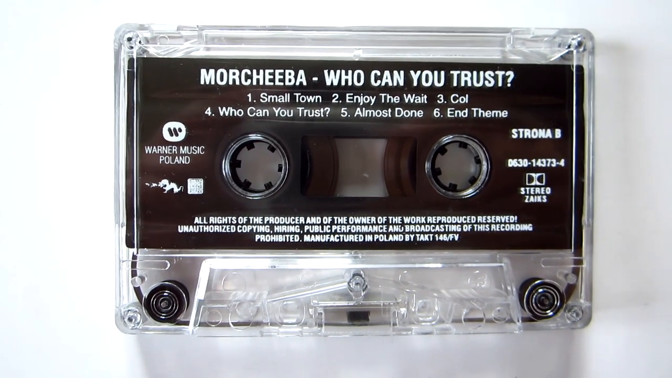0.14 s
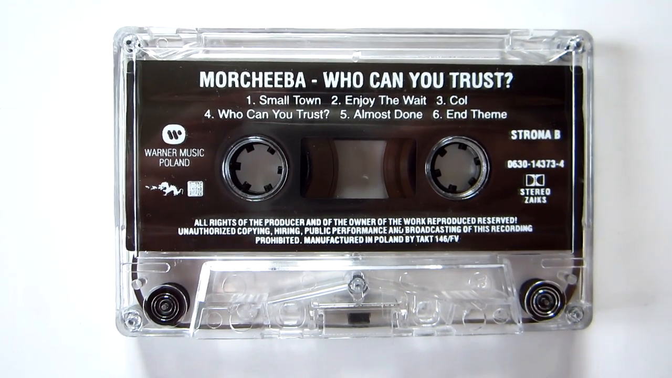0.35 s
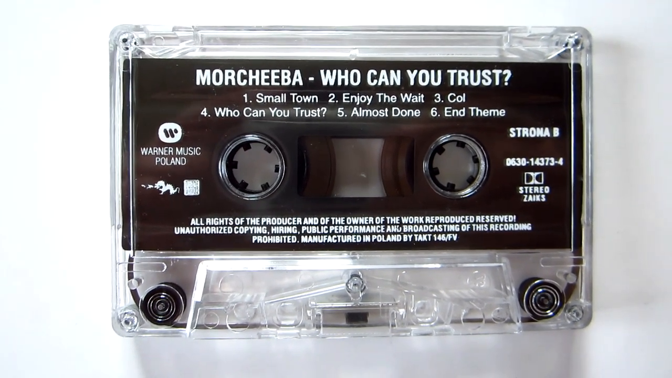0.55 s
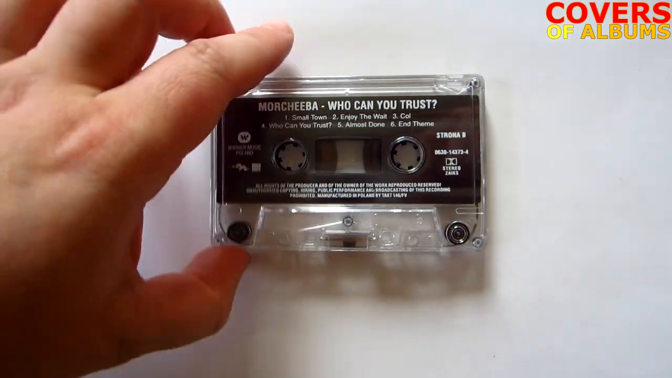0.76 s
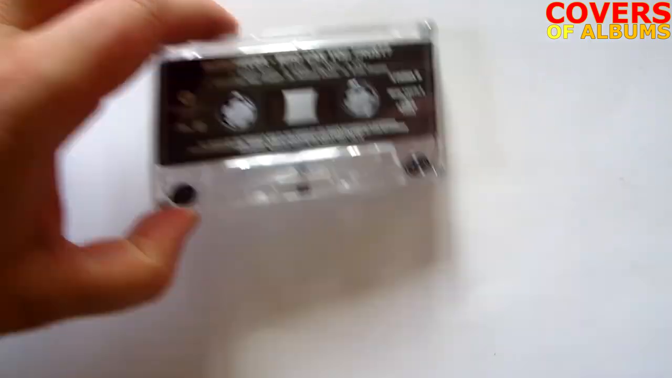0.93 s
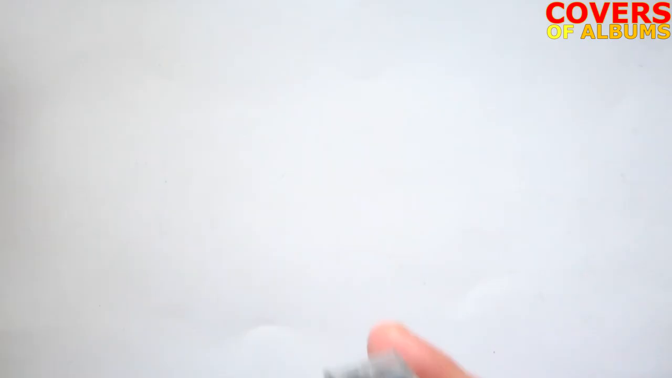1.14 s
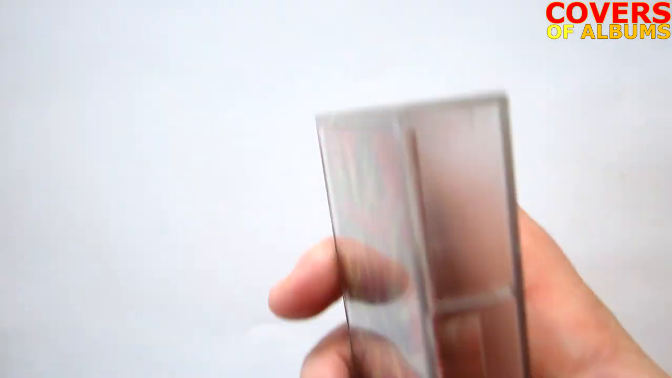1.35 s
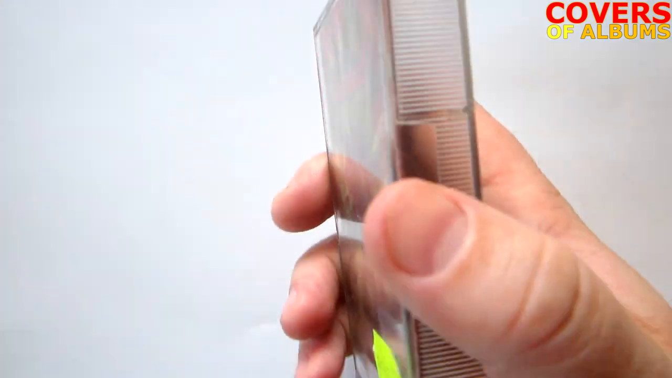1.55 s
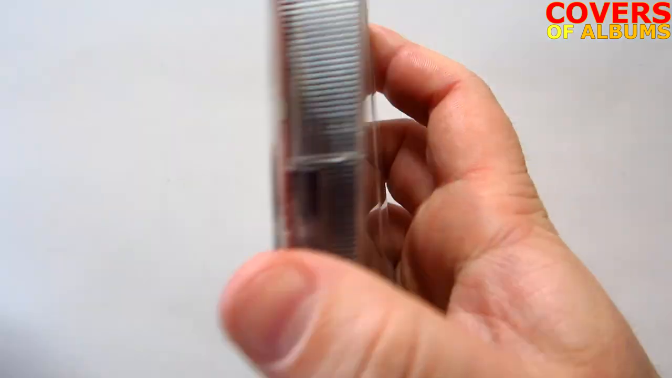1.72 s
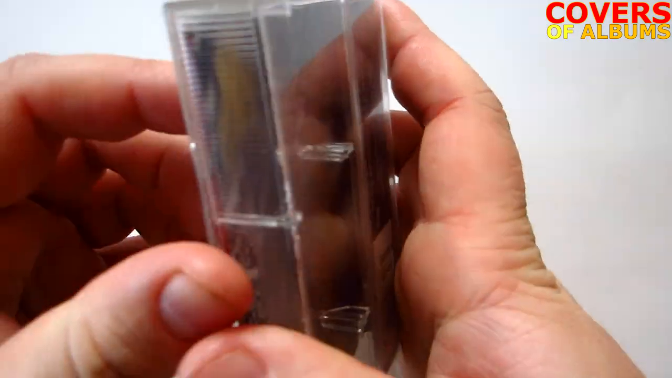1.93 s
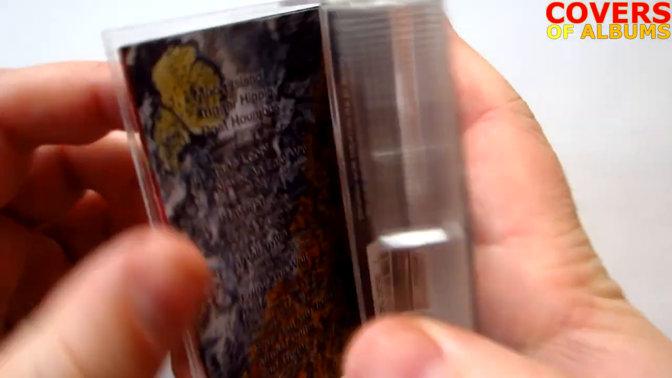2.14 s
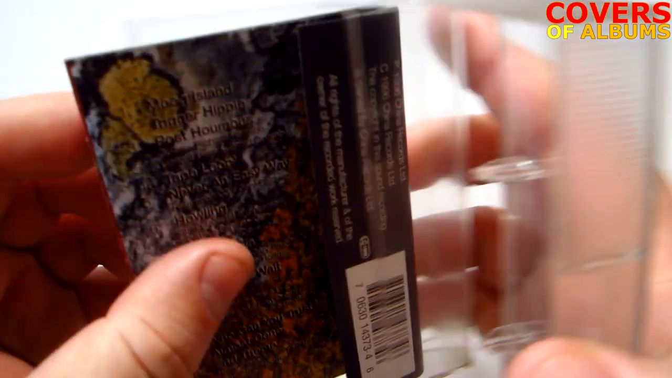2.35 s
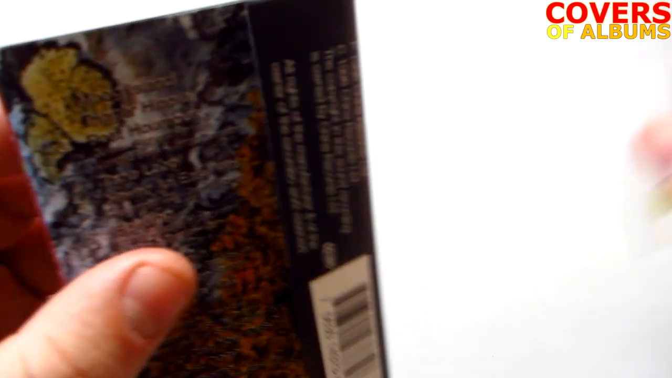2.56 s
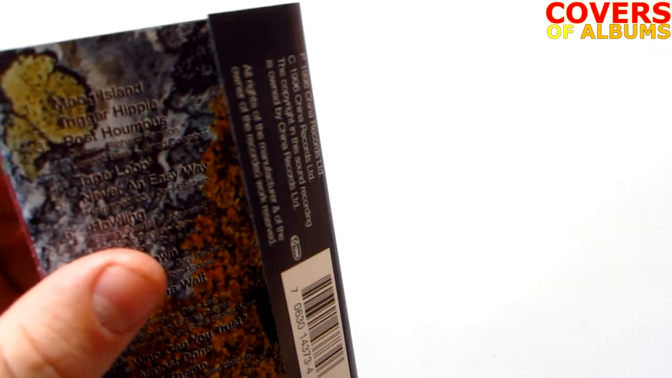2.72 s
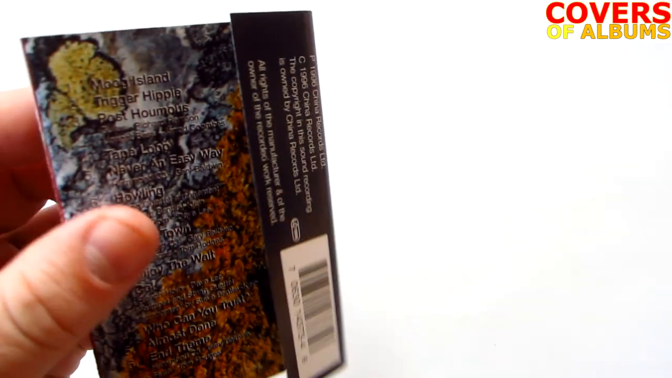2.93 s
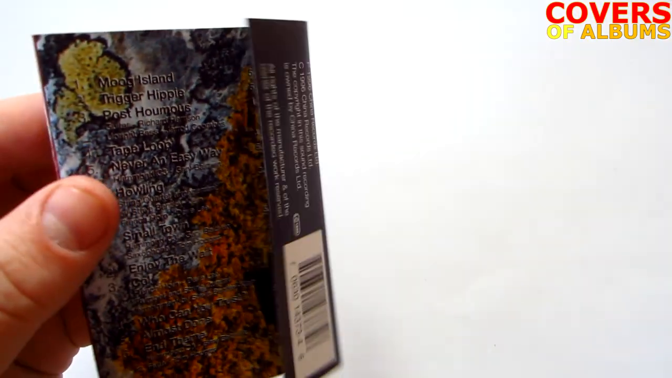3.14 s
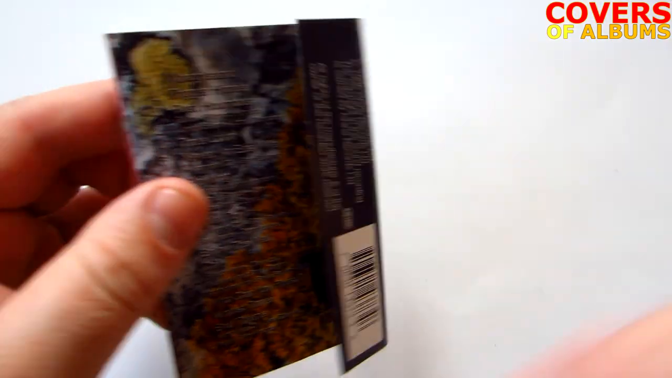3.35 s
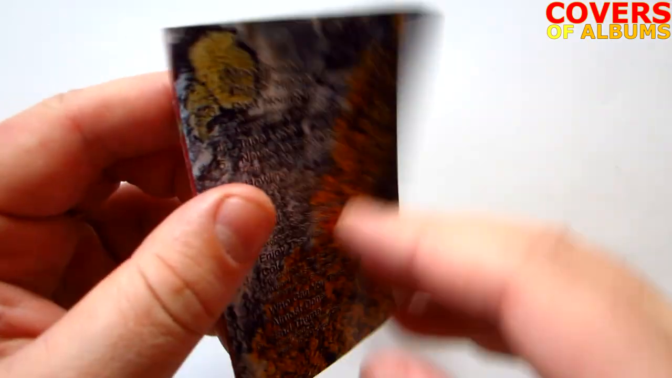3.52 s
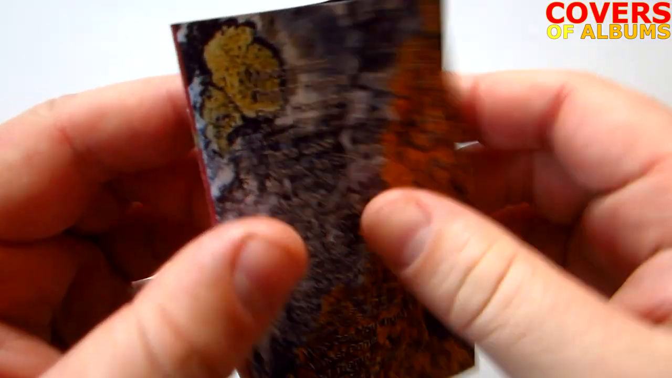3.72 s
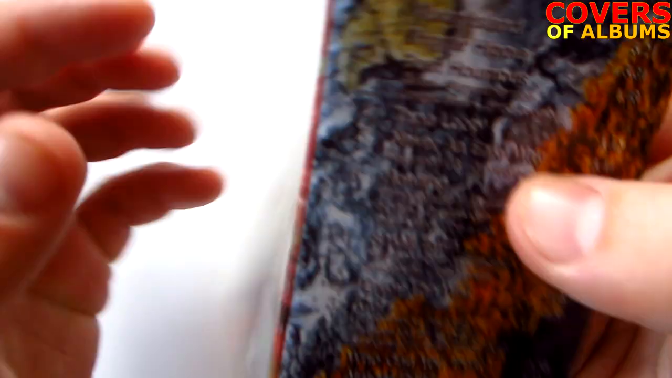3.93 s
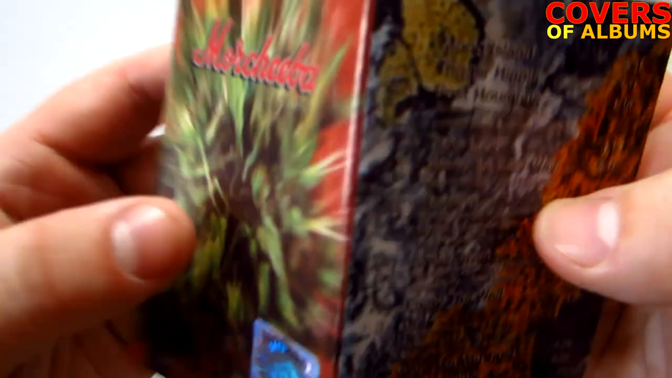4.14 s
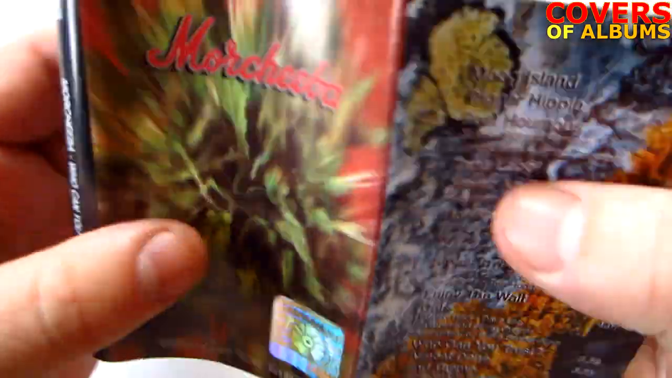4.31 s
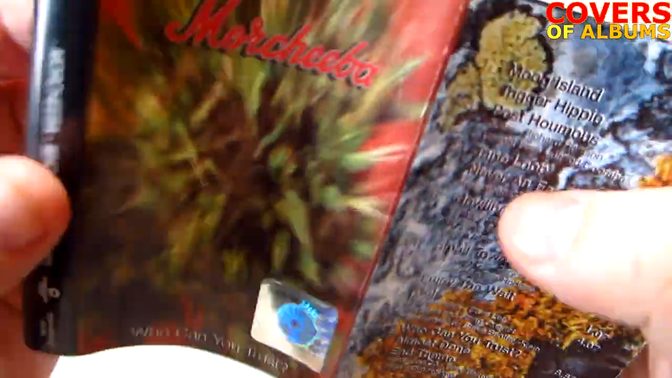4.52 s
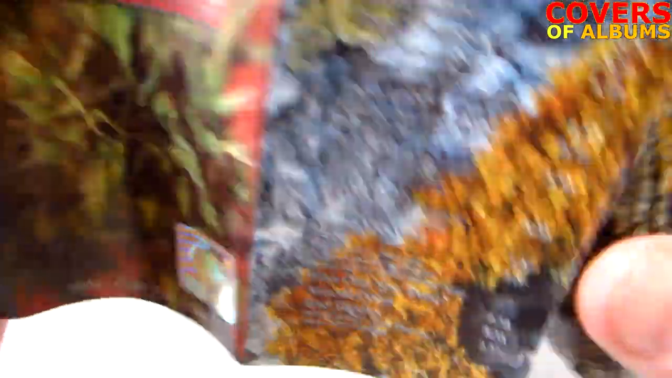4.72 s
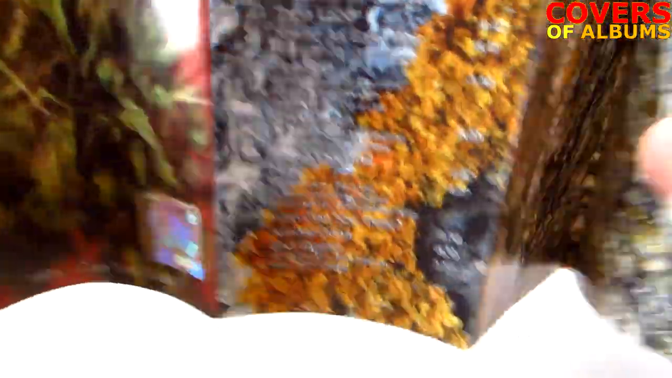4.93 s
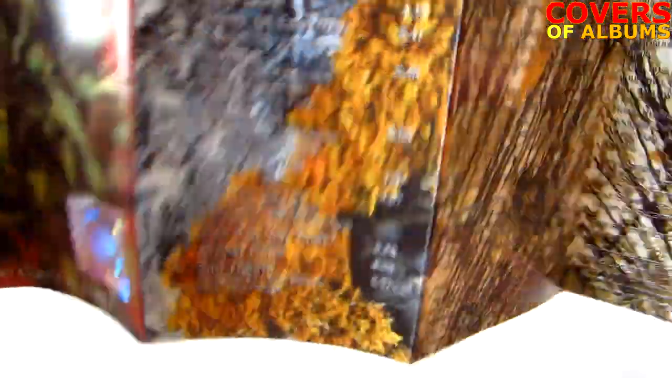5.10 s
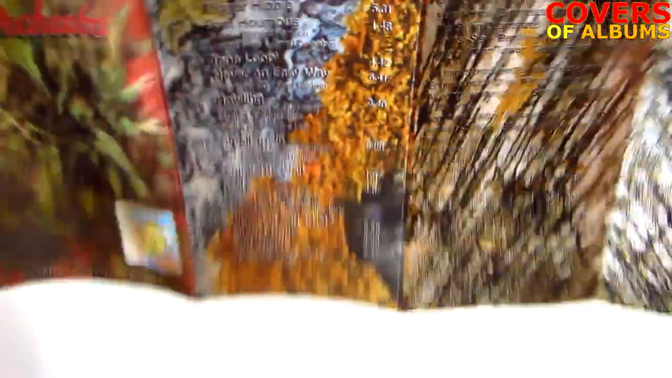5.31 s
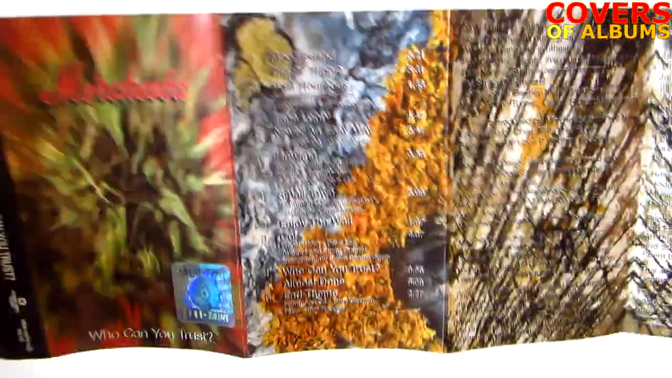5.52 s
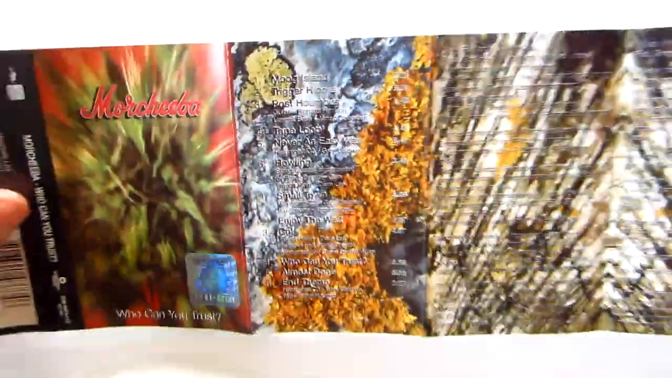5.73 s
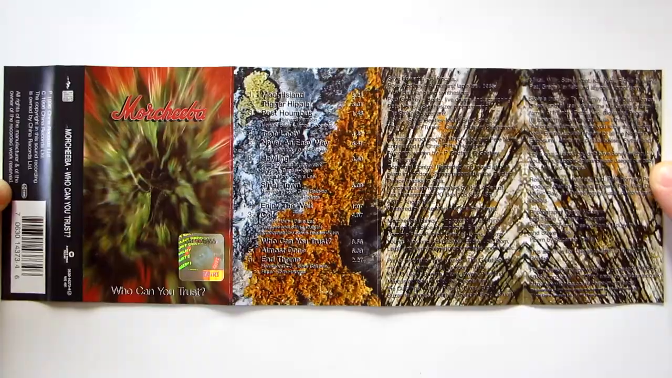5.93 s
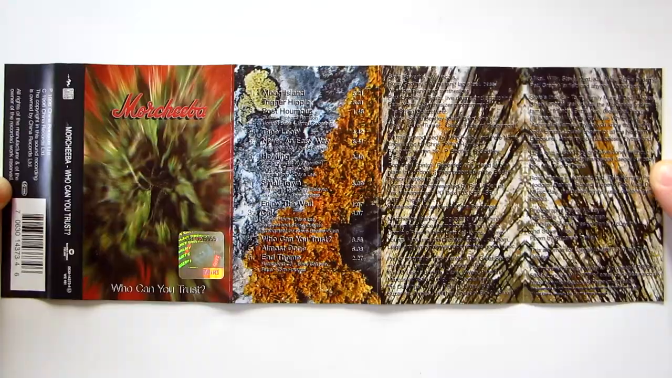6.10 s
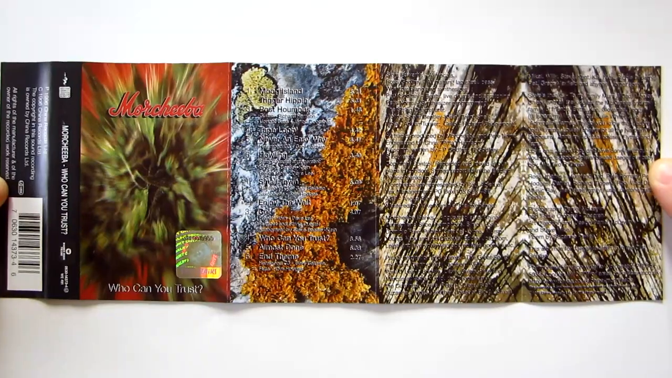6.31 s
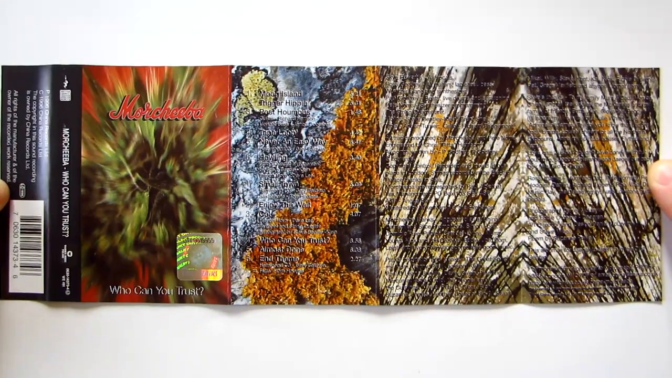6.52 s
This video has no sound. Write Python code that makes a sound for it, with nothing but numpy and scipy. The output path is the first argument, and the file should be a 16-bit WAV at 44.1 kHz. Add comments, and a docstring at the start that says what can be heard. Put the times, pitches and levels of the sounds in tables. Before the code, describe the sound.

Thin plastic clatters and a case clicks open, a scrape and hard knocks follow, then a folded paper insert crinkles open in a quiet room.

```python
"""A quiet room, with a small microphone close to the hands.
A cassette is picked up and laid aside; its plastic case snaps open, the card insert slides out, and the case
is shut and clatters onto the desk. Then the folded insert is opened panel by panel, rubbing, snapping, flapping.
Knocks and snaps are cracks with clouds of modes, rubbing is many tiny slips, flaps are damped low sways;
noise makes the handling rumble, the room's echoes and the background hiss."""
import sys
import numpy as np
from scipy import signal
from scipy.fft import rfft, irfft
from scipy.io import wavfile
from scipy.ndimage import uniform_filter1d

SR = 44100
rng = np.random.default_rng(int(sys.argv[2]) if len(sys.argv) > 2 else 0)


def persist_wave(psi):
    """Save psi, clipped to +-1, as 16-bit WAV."""
    counts = np.round(np.clip(psi, -1, 1) * 32767).astype(np.int16)
    wavfile.write(sys.argv[1], SR, np.atleast_2d(counts).T)


N = 293815
HZ = np.fft.rfftfreq(4096, 1 / SR)  # frequency grid of every colour filter

# Overall colour of hard plastic, close up: (frequency [Hz], gain [dB])
PLASTIC_COLOUR = [(60, -21), (400, -4), (1300, 4.5), (3200, 1.5), (5000, -2), (9000, -7.5), (16000, -21.5)]


def plastic_knocks(knocks, modes, room_db):
    """Each knock rings the modes of its body; returns the close sound and the part sent into the room."""
    direct, sent = np.zeros((2, N))
    hardness = dict(ring_db=7.5, rise_s=0.0014, crack=0.47)
    body, rings = read(PLASTIC_COLOUR, HZ), resonances(modes)
    for s, *blow in knocks:
        add(direct, s, strike(body + rings, *blow, **hardness))
        blended = strike(body + rings / 2, *blow, **hardness)  # in the room the resonances blend
        add(sent, s, gain_of(room_db) * blended)
    return direct, sent


# Knocks of the cassette, picked up and laid aside: (time [s], level over 10 ms [dB], bass [dB],
# treble [dB], main ring [Hz], decay by 60 dB [s])
CASSETTE_KNOCKS = [(0.856, -35.5, -11, 8.5, 1940, .06), (0.875, -34.5, 6, 1, 1490, 0.025),
                   (0.8832, -30, -9, -2.5, 1860, 0.014), (0.9155, -28.5, -11.5, -32, 1800, 0.022),
                   (0.926, -26.5, -25, -20, 1820, 0.015), (0.9543, -37.5, -14, -15, 1790, 0.013),
                   (1.177, -43.5, 6, -6, 1800, 0.04), (1.485, -18, 3, 4, 1760, 0.026),
                   (1.573, -24.5, 2, 5, 1700, 0.045), (1.592, -21, 8, 4.5, 1700, 0.033),
                   (1.607, -27.5, 11, 7, 1720, .07)]
# Resonances of the cassette's body: (frequency [Hz])
CASSETTE_MODES = [330, 600, 880, 1270, 1720, 2520, 3050]


def cassette():
    """The cassette's thin walls ring at each knock."""
    return plastic_knocks(CASSETTE_KNOCKS, CASSETTE_MODES, room_db=-14)


# Clicks of the lid, opened and shut in the hands: (time [s], level over 10 ms [dB], bass [dB],
# treble [dB], main ring [Hz], decay by 60 dB [s])
LID_CLICKS = [(1.9425, -39, 20, -4, 1065, 0.045), (2.02, -40.5, 3, -3, 1395, 0.094),
              (2.077, -13.5, -3.5, 6.5, 1277, 0.018), (2.116, -25.5, -27, -3.5, 2586, 0.011),
              (2.1799, -32.5, -24, -16.5, 3450, 0.016), (2.3, -42, 5, 3, 2745, .03),
              (2.629, -30, -12.5, -2.5, 3200, 0.036), (2.6408, -15.5, -18, -5, 3170, .028),
              (2.689, -30.5, 4.5, 1, 2370, 0.042), (2.743, -14.5, 3, 13, 876, 0.021)]
# Resonances of the lid: (frequency [Hz])
LID_MODES = [572, 871, 1404, 1900, 2500, 3150, 3605]


def lid():
    """The lid's thin walls ring at each click."""
    return plastic_knocks(LID_CLICKS, LID_MODES, room_db=-17)


# Bounces of the shut case on the desk: (time [s], level over 10 ms [dB], bass [dB],
# treble [dB], main ring [Hz], decay by 60 dB [s])
CASE_BOUNCES = [(2.943, -18.5, -3.5, -11.5, 1070, 0.023), (2.9823, -16.5, 2.5, 3, 3240, 0.036),
                (3.0713, -19.5, 2.5, -6, 1210, 0.057), (3.128, -18, -0.5, -6.5, 3700, 0.034)]
# Resonances of the shut case: (frequency [Hz])
CASE_MODES = [1092, 1288, 1923, 2290, 2710, 3410, 3895]


def case_on_desk():
    """The shut case rings at each bounce."""
    return plastic_knocks(CASE_BOUNCES, CASE_MODES, room_db=-12)


# Sliding on plastic: the cassette is taken up, the lid pried and swung, the card drawn out over the rim,
# the lid closed over its catch, the case skids on the desk: (time of the fastest moment [s], rise [s],
# fall [s], level below the treble [dB], treble relative to it [dB])
SLIDES = [(0.87, 0.012, 0.018, -40.5, -13), (0.95, 0.037, 0.046, -48, -3),
          (1.074, 0.0053, 0.0084, -46.5, -3.5), (1.19, 0.028, 0.029, -51, -0.5),
          (2.074, 0.016, 0.093, -43, -5.5), (2.195, 0.038, 0.025, -40.5, -10.5),
          (2.385, 0.03, 0.078, -21.5, -13.5), (2.468, 0.045, 0.032, -17.5, -6.5),
          (2.491, 0.014, 0.011, -20.5, -5.5), (2.525, 0.0053, 0.017, -37.5, -3.5),
          (2.61, 0.065, 0.049, -36.5, -12.5), (2.688, 0.017, 0.024, -28, -12.5),
          (2.742, 0.0087, 0.0092, -25.5, -7.5), (3.123, 0.0066, 0.014, -23, -18)]
# Colour of plastic under a sliding edge: (frequency [Hz], gain [dB])
SLIDE_COLOUR = [(150, -39.5), (850, -20), (1500, -6.5), (3300, 0), (6000, -6.5), (10500, -5.5),
                (16000, -17.5)]


def slides():
    """Surfaces scrape over plastic in sharp little slips; returns the close sound and the room's part."""
    level_db, treble_db = strokes(SLIDES)
    slide = friction(level_db, treble_db, read(SLIDE_COLOUR, HZ), slips_per_s=3500, smooth=0.35)
    return slide, gain_of(-25.5) * slide


# Snaps of the paper's edges and creases: (time [s], level over 10 ms [dB], bass [dB], treble [dB],
# main ring [Hz])
SNAPS = [(3.572, -40.5, 7, -5, 3860), (3.589, -34.5, -1, -14, 3120), (3.6203, -43, -2, 5, 2480),
         (3.631, -45, -10, 4, 7400), (3.6896, -35.5, 14.5, 0.5, 3160), (3.7079, -36, -2, -8, 7140),
         (3.7748, -37, -5, -6, 2300), (3.832, -37, 4.5, 1.5, 3930), (3.9488, -56, -10, 4, 5800),
         (3.9662, -28.5, -23, -18, 1620), (3.979, -36, 0, -20, 2450), (4.219, -43, 6, -13, 2120),
         (4.259, -29, 15, -12.5, 2390), (4.5359, -34, 16.5, -7, 3700), (4.554, -42, -14, -6, 9500),
         (4.6118, -36, -15, -15, 3700), (4.794, -46, 27, -16, 2570), (4.879, -39, 6, -3.5, 2770),
         (4.929, -48.5, -3, -4, 4700), (4.989, -48.5, 2, 0, 3900), (5.101, -37, 22.5, -8, 2600),
         (5.175, -47.5, 28, 2, 790), (5.2249, -27.5, -3, -11.5, 2830), (5.3111, -23.5, 2.5, -18, 2710),
         (5.356, -42.5, 22, -5, 2690), (5.832, -32.5, -17, 0, 2160)]
# Colour of the snapping paper, close up: (frequency [Hz], gain [dB])
PAPER_COLOUR = [(60, -5), (350, -4.5), (750, 2), (1300, -1.5), (2300, 5.5), (4500, 3.5), (10000, 3),
                (16000, -11)]


def paper_snaps():
    """A crease gives way with a sudden crack and a very short ring of the sheet."""
    out, body = np.zeros(N), read(PAPER_COLOUR, HZ)
    for s, *blow in SNAPS:
        add(out, s, strike(body, *blow, t60=0.018, ring_db=12.5, rise_s=0.00045, crack=0.61))
    return out


# Strokes of fingers and panels on paper: (time of the fastest moment [s], rise [s], fall [s],
# level below the treble [dB], treble relative to it [dB])
RUBS = [(3.6, 0.028, 0.045, -48, -3), (3.668, 0.037, 0.012, -39.5, -4), (3.735, 0.069, 0.022, -44.5, -8.5),
        (3.795, 0.047, 0.022, -35, -4.5), (3.88, 0.07, 0.051, -49.5, -8), (4.3, 0.24, 0.89, -54.5, -5.5),
        (4.505, 0.06, 0.074, -41.5, -7), (4.668, 0.081, 0.068, -44.5, -4),
        (4.722, 0.0079, 0.044, -41, -2.5), (5.03, 0.057, 0.011, -46, -13), (5.22, 0.18, .015, -51.5, -7),
        (5.309, 0.038, 0.026, -35.5, -12), (5.415, 0.044, 0.044, -42.5, -9.5),
        (5.535, 0.019, 0.022, -46, -4), (5.595, 0.032, 0.06, -50.5, 1.5), (5.77, 0.051, 0.073, -49, 0.5),
        (5.826, 0.017, 0.018, -35, -18), (5.94, 0.035, 0.024, -46, -5)]
# Colour of rubbed paper: (frequency [Hz], gain [dB])
RUB_COLOUR = [(100, -25.5), (1500, -2.5), (2200, 2), (3300, 0.5), (4700, -2.5), (9500, -2.5),
              (16000, -16.5)]


def paper_rubs():
    """Fingers and panels rub in grainy slips, over a faint rustle of the held sheet between strokes."""
    rustle = gain_of(-59) * held()
    rustle_treble = gain_of(-5) * rustle
    level_db, treble_db = strokes(RUBS, rustle ** 2, rustle_treble ** 2)
    return friction(level_db, treble_db, read(RUB_COLOUR, HZ), slips_per_s=2200, smooth=.6)


# Low pushes from things that move: (time [s], level over the first 20 ms [dB], pitch [Hz])
THUMPS = [(1.594, -35, 227), (1.943, -47.5, 119), (3.831, -47, 68.6), (4.26, -36.5, 105),
          (4.537, -37.5, 75.6), (4.885, -41.5, 81), (5.174, -44, 101), (5.315, -48, 146),
          (5.324, -42.5, 308)]


def thumps(t60=0.068):
    """Each push is one damped sway with a dull flutter on top."""
    out, t = np.zeros(N), np.arange(SR // 5) / SR
    for s, db, hz in THUMPS:
        flutter = evened(colour(rng.standard_normal(len(t)), 20 * above(hz) - 45 * above(4 * hz)))
        sway = np.sin(2 * np.pi * hz * t)
        push = (sway + 0.61 * flutter) * gain_of(-60 * t / t60)
        add(out, s, gain_of(db) * push / np.std(push[:SR // 50]))
    return out


def handling():
    """The held sheet rumbles softly while it is being moved."""
    rumble_colour = [(25, -10.0), (100, -11.5), (900, -20.0), (3000, -69.0)]  # (frequency [Hz], gain [dB])
    rumble = evened(colour(rng.standard_normal(N), read(rumble_colour, HZ)))
    return gain_of(-57.0 + 4.4 * waver(25)) * held() * rumble


# Colour of the room's echoes: (frequency [Hz], gain [dB])
ROOM_COLOUR = [(100, 3), (1000, 2.5), (2500, -2.5), (14000, 2.5)]
# Decay of the room: (frequency [Hz], decay by 60 dB [s])
ROOM_T60 = [(900, 0.26), (3500, 0.23), (12000, 0.15)]


def room(x, build_s=0.0097):
    """A small room: dense echoes that build up quickly, each band dying at its own speed."""
    hz, t, z = signal.stft(rng.standard_normal(SR // 2), SR, nperseg=256)
    decay_db = -60 * t / read(ROOM_T60, hz)[:, None]
    z *= gain_of(read(ROOM_COLOUR, hz)[:, None] + decay_db)
    tail = signal.istft(z, SR, nperseg=256)[1]
    tail *= 1 - np.exp(-(np.arange(len(tail)) / SR / build_s) ** 2)
    return signal.oaconvolve(x, tail / np.linalg.norm(tail))[:N]


# Colour of the background, rumble to hiss: (frequency [Hz], relative level per Hz [dB])
HISS_COLOUR = [(15, -44.5), (25, -1.5), (157, -4.5), (700, -13), (1520, -17), (7710, -24), (14400, -32.5),
               (16000, -69.5)]
# Its loudness through the scene: (time [s], level [dB])
HISS_LEVEL = [(0, -56.5), (2.1, -55), (6.0, -62), (6.66, -58)]


def hiss():
    """Background rumble and hiss, coloured noise; it sinks slowly until 6 s and then creeps back."""
    noise = evened(colour(rng.standard_normal(N), read(HISS_COLOUR, HZ)))
    return gain_of(follow(HISS_LEVEL)[0]) * noise


def strike(body, level_db, bass_db, treble_db, ring_hz, t60, ring_db, rise_s, crack):
    """A crack and a dense, quickly dying cloud of modes, with one broad resonance standing out."""
    t = np.arange(len(HZ) * 2) / SR
    cloud = rng.standard_normal(len(t)) * gain_of(-60 * t / t60) * (1 - np.exp(-t / rise_s))
    cloud /= np.linalg.norm(cloud)
    cloud[SR // 1000] += crack  # one sharp impulse, 1 ms in
    z = rfft(cloud)
    z /= np.sqrt(uniform_filter1d(abs(z) ** 2, size=50))  # the blow feeds all bands alike
    fade_out = np.clip(2 - 2 * t / t[-1], 0, 1) ** 2
    cloud = irfft(z) * fade_out
    ring = ring_db / (1 + ((HZ / ring_hz - 1) / .14) ** 2)
    tone = bass_db * (1 - above(950)) + treble_db * above(4900)
    sound = colour(cloud, body + ring + tone)
    return gain_of(level_db) * sound * np.sqrt(SR / 100) / np.linalg.norm(sound)  # energy as over 10 ms


def resonances(modes):
    """Gain in dB, on the grid HZ, of thin plastic walls that ring at these frequencies."""
    height_db, width_hz, damping = 9, 10, .007  # half width at zero pitch, and its growth with pitch
    peaks = sum(1 / (1 + ((HZ - hz) / (width_hz + damping * hz)) ** 2) for hz in modes)
    return 10 * np.log10(1 + gain_of(height_db) ** 2 * peaks)


def friction(level_db, treble_db, body, slips_per_s, smooth):
    """Tiny slips of uneven size over a smooth hiss, coloured by the flexing surface."""
    slips = rng.choice([-1, 1], N) * (rng.random(N) < slips_per_s / SR)
    slips = slips * gain_of(2.6 * np.minimum(rng.exponential(1, N), 3))
    unsteady = gain_of(1.2 * waver(90) + 1.3 * waver(700))
    drive = (evened(slips) + smooth * rng.standard_normal(N)) * unsteady
    sound = colour(flex(drive, depth_db=2.8), body)
    treble = signal.sosfiltfilt(signal.butter(2, 5500, "high", fs=SR, output="sos"), sound)
    return gain_of(level_db) * (evened(sound - treble) + gain_of(treble_db) * evened(treble))


def flex(x, depth_db):
    """As the grip shifts and the surface bends, its resonances come and go."""
    z = signal.stft(x, nperseg=256, noverlap=192)[2]
    patches = rng.standard_normal(z.shape)
    for _ in range(2):  # smoothed over frequency, then over time
        patches = uniform_filter1d(uniform_filter1d(patches, size=10, axis=0), size=5, axis=1)
    return signal.istft(z * gain_of(depth_db * evened(patches)), nperseg=256, noverlap=192)[1][:N]


def strokes(rows, rest=1e-12, rest_treble=1e-12):
    """Each stroke speeds up and slows down, its power adding to a resting power; level and treble in dB."""
    drop_db, curve = 19, 1.37  # how far down one rise before or one fall after the peak; roundness
    t = np.arange(N) / SR
    for s, rise_s, fall_s, level_db, treble_db in rows:
        away = np.minimum(np.maximum((s - t) / rise_s, (t - s) / fall_s), 10)
        power = gain_of(level_db - drop_db * away ** curve) ** 2
        rest = rest + power
        rest_treble = rest_treble + power * gain_of(treble_db) ** 2
    return 10 * np.log10(rest), 10 * np.log10(rest_treble / rest)


def held():
    """1 while the sheet is kept moving in the hands, a thousandth before and after."""
    from_s, to_s, fade_s = 3.9, 5.975, 0.0038  # until the sheet is pulled flat
    t = np.arange(N) / SR
    return np.clip(np.minimum(t - from_s, to_s - t) / fade_s + .5, 1e-3, 1)


def gain_of(db):
    """Decibels to amplitude."""
    return 10 ** (np.asarray(db) / 20)


def evened(x):
    """Scales to rms 1."""
    return x / np.sqrt(np.mean(x ** 2) + 1e-20)


def read(points, hz):
    """Reads a spectrum on a log-frequency axis."""
    f, value = np.transpose(points)
    return np.interp(np.log(hz + 1), np.log(f), value)


def follow(rows):
    """The columns of a curve, sample by sample."""
    s, *columns = np.transpose(rows)
    return [np.interp(np.arange(N) / SR, s, c) for c in columns]


def add(mix, s, sound):
    """Mixes a sound in at time s."""
    part = mix[round(s * SR):][:len(sound)]
    part += sound[:len(part)]


def colour(x, db):
    """Causal, minimum-phase filter with the gain db on the grid HZ."""
    log_gain = np.log(gain_of(np.r_[db, db[-2:0:-1]]))
    taps = np.fft.ifft(np.exp(np.conj(signal.hilbert(log_gain)))).real
    return signal.oaconvolve(x, taps)[:len(x)]


def above(edge_hz):
    """Smooth step on the grid HZ, from 0 below the edge to 1 above it."""
    return 1 - 1 / (1 + (HZ / edge_hz) ** 4)


def waver(per_s):
    """Random drift of rms 1: noise averaged twice over 1 / per_s seconds."""
    size = max(int(SR / per_s), 1)
    return evened(uniform_filter1d(uniform_filter1d(rng.standard_normal(N), size), size))


def scene():
    """Plastic and paper close to the microphone, the room behind them."""
    plastic, sent = np.sum([cassette(), lid(), case_on_desk(), slides()], axis=0)
    paper = paper_rubs() + paper_snaps()
    echoes = room(sent + gain_of(-18) * paper)
    return (plastic + paper + thumps() + handling() + echoes + hiss())[None]


def record(dry):
    """Full-scale limit, then the band limit at 16.1 kHz."""
    low_pass = signal.firwin(255, 16100, window=("kaiser", 8), fs=SR)
    return signal.oaconvolve(np.clip(dry, -1, 1), low_pass[None], "same")


dry = scene()
out = record(dry)
persist_wave(out)
```